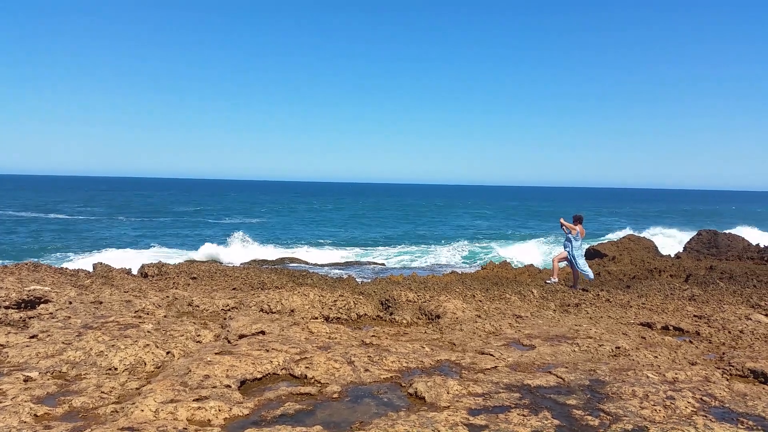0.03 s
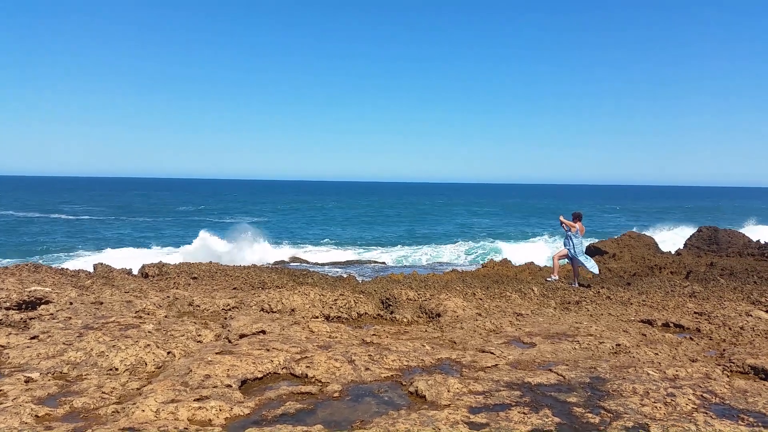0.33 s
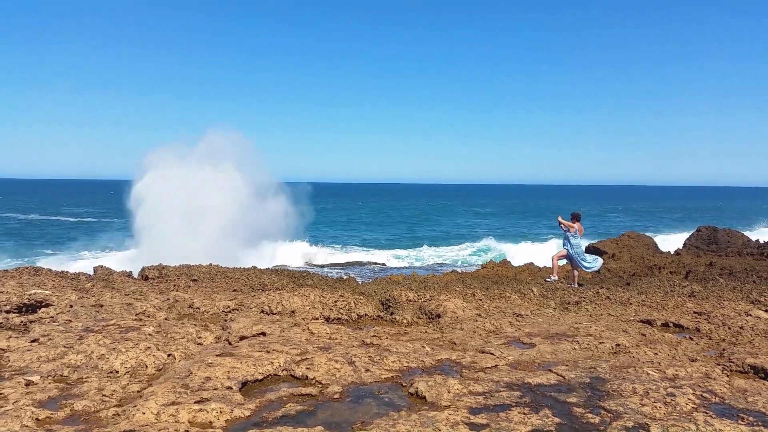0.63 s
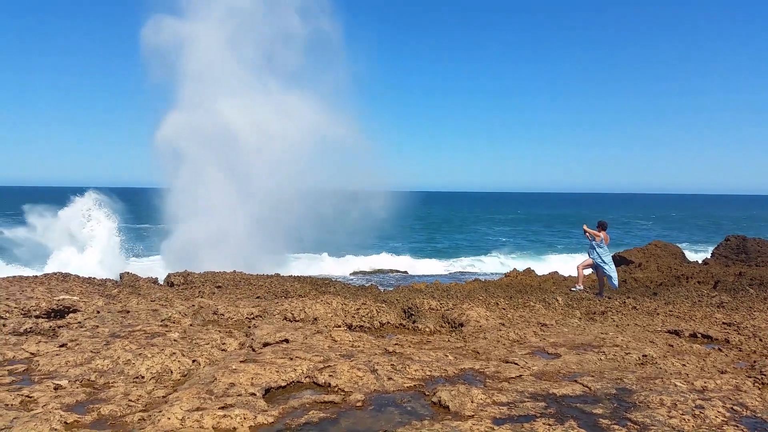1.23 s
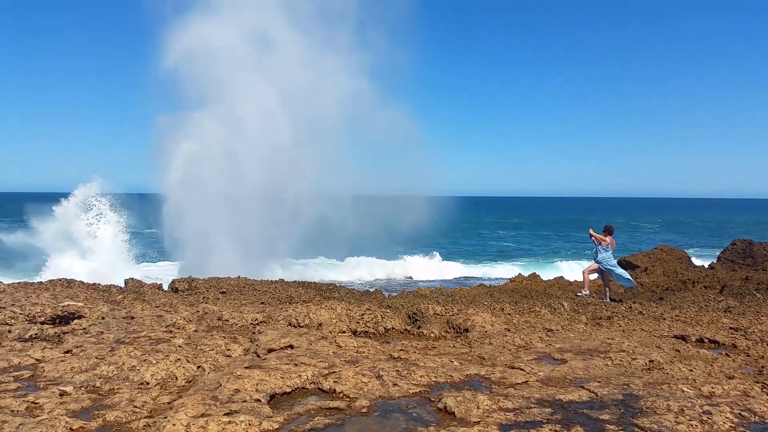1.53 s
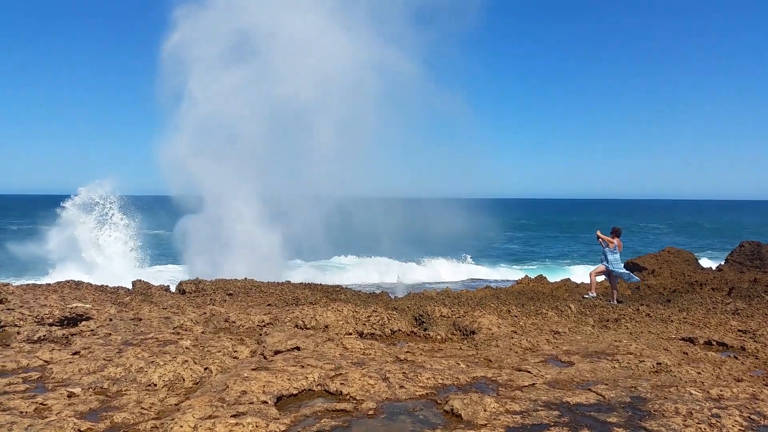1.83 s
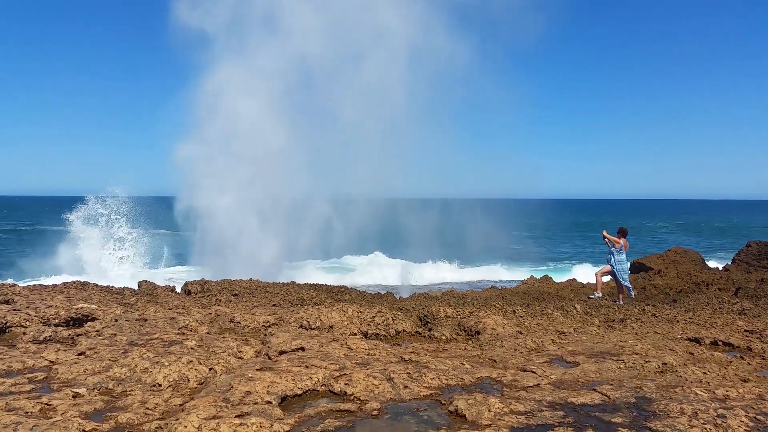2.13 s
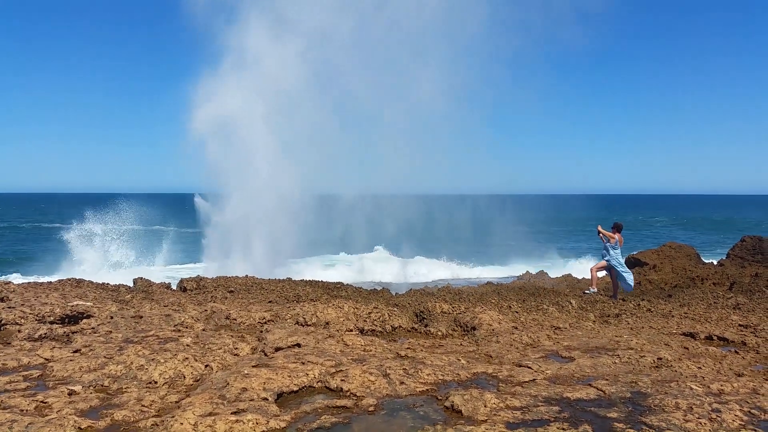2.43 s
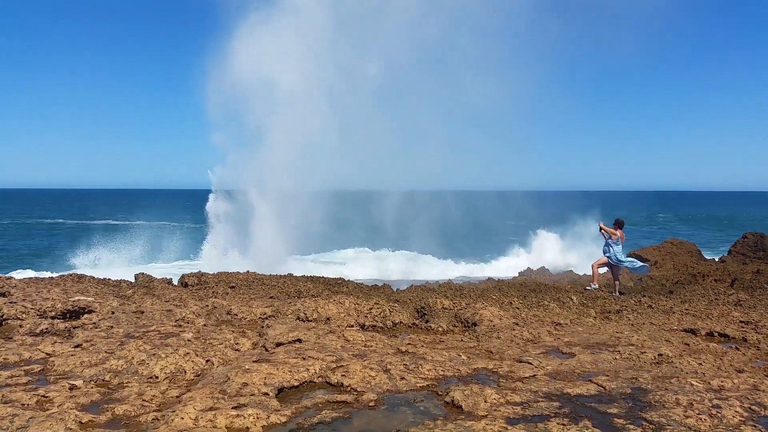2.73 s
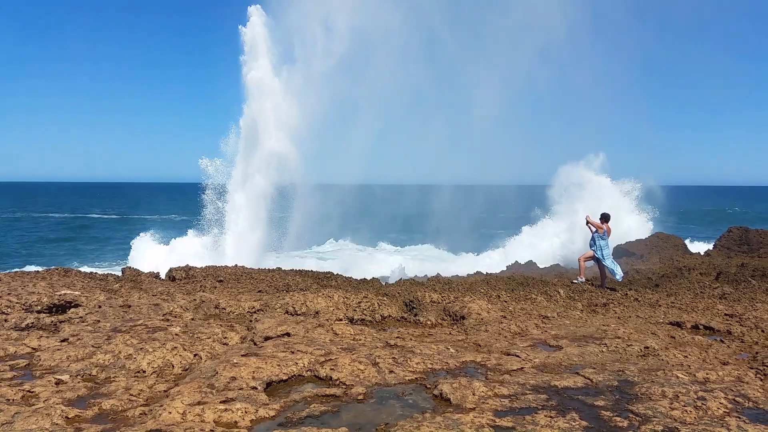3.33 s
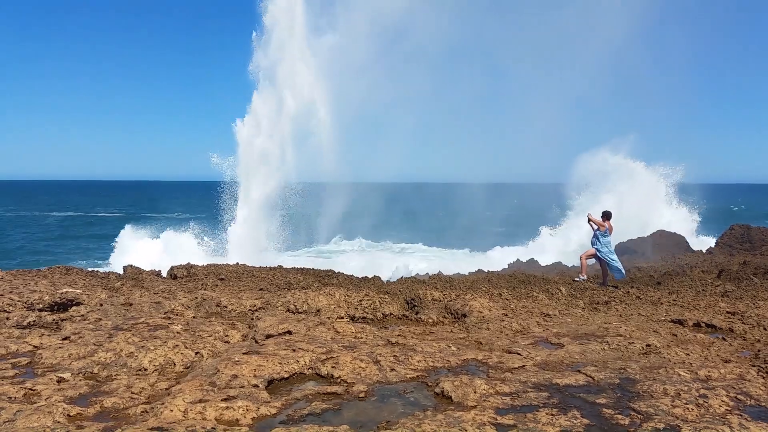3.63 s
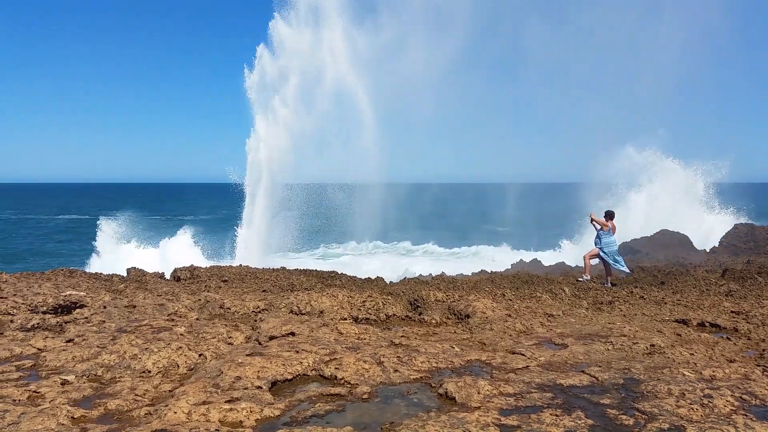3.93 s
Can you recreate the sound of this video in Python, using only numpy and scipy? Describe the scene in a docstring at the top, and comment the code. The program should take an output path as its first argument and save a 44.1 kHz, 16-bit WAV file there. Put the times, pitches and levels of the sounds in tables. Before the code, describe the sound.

Ocean surf makes a low, steady wash against coastal rocks, heard through loud, ragged wind buffeting the microphone. The high hiss of blowhole spray swells, dips briefly and returns, with a light patter of coarse drops near the end.

```python
"""Surf on a rocky shore, heard through a gusty sea wind. From the start, breakers make a dull wash
while eddies (swirls of air) sweep across the two microphone openings separately: a rumble that
tears, flaps and cracks in the gusts. From half a second on, a blowhole throws up hissing spray.
The hiss dips briefly at about two seconds, and just after three seconds a second jet
adds a patter of coarse drops."""
import sys
import numpy as np
from scipy import signal
from scipy.fft import rfft, irfft, next_fast_len
from scipy.io import wavfile
from scipy.ndimage import uniform_filter1d, map_coordinates

SR = 44100
rng = np.random.default_rng(int(sys.argv[2]) if len(sys.argv) > 2 else 0)


def bounce(signal):
    """Save signal as a 16-bit WAV file at the path given by the first command-line argument."""
    frames = np.transpose(np.atleast_2d(signal))
    limited = np.clip(frames, -1, 1)
    pcm = np.round(limited * 32767).astype(np.int16)
    wavfile.write(sys.argv[1], SR, pcm)


N = 176400  # 4 seconds
LEFT, RIGHT = -1, 1


def wind(gusts, side, rumble_db, rumble_growth, rasp_db):
    """Eddies blow past one microphone opening: stronger wind makes them louder and faster."""
    # tone of the eddies at wind strength 0: pitch_hz, level_db
    eddy_tone = [(25, -25), (60, 2), (130, 1.5), (230, -2.5), (330, -9.5), (500, -17), (900, -31.5),
                 (1600, -61), (3000, -71), (6000, -100)]
    # tone of the wind shaking the whole microphone body: pitch_hz, level_db
    rumble_tone = [(20, -9), (35, -2), (50, -4), (70, -3.5), (110, -2.5), (170, -7), (260, -13.5),
                   (400, -32.5), (800, -52.5)]
    # the opening lets mostly the low sounds through: pitch_hz, gain_db
    opening_filter = [(20, -11.5), (70, 1.5), (1500, 1), (2500, -10), (3500, -25), (4600, -28), (6000, -49),
                      (9000, -69)]
    overload_db, ceiling = 17, .96  # soft limits on the wind strength and on the air pressure
    flutter_db, double_speed_db = 2.5, 18  # random swing; rise in wind that doubles the eddies' speed
    eddy_db, eddy_growth = -20, .65  # a growth is the dB of sound gained per dB of wind
    flow = airflow(gusts, side)
    strength = soft_limit(flow, overload_db)
    speed = 2 ** ((strength + flutter_db * wander(596.9)) / double_speed_db)
    pattern = noise(eddy_tone, size=2 * N)
    # run through the pattern of eddies at the wind's changing speed
    eddies = map_coordinates(pattern, [np.cumsum(speed)], order=3, mode="wrap")
    eddies *= gain(eddy_db + eddy_growth * strength)
    rumble = noise(rumble_tone) * gain(rumble_db + rumble_growth * strength)
    pressure = soft_limit(eddies + rumble + rasp(flow, rasp_db), ceiling)
    return shape_tone(pressure * fade_ends(), opening_filter)


def airflow(gusts, side):
    """Wind strength in dB: the gusts flap at random and leap briefly when a single eddy slaps."""
    # eddies that slap one opening: time_s, peak_strength_db, side (-1 left, 1 right)
    slaps = [(.03, 23.14, -1), (0.05, 14.74, -1), (.062, 21.9, -1), (.073, 23.05, -1), (.104, 24.76, -1),
             (0.115, 26.95, -1), (.142, 21.64, -1), (.155, 24.9, -1), (.178, 9.13, 1), (.183, 23.66, -1),
             (0.2, 22.38, -1), (0.284, 21.02, -1), (.304, 23.27, -1), (.326, 22.13, -1), (.347, 27.46, -1),
             (.371, 21.04, -1), (.393, 20.08, -1), (.417, 21.86, -1), (0.442, 20.47, -1), (.467, 14.69, -1),
             (.553, 17, -1), (0.636, 19.13, -1), (.649, 22.25, -1), (.671, 14.99, -1), (.728, 12.01, -1),
             (.761, 13.9, -1), (.773, 19.98, -1), (.794, 12.53, -1), (.832, 19.15, -1), (.908, 14.06, -1),
             (1.161, 9.96, -1), (1.247, 17.1, -1), (1.265, 21.68, -1), (1.288, 18.64, -1),
             (1.322, 15.05, -1), (1.351, 12.37, -1), (1.69, 8.03, 1), (1.729, 13.16, -1), (1.735, 12.16, 1),
             (1.793, 14.33, -1), (1.828, 12.56, -1), (1.898, 21.04, -1), (1.948, 23.05, -1),
             (1.961, 19.97, -1), (1.973, 18.8, -1), (2.006, 13.05, -1), (2.047, 21.98, -1),
             (2.072, 16.21, -1), (2.121, 20.53, -1), (2.146, 12.3, 1), (2.157, 16.51, -1),
             (2.192, 20.85, -1), (2.208, 16.35, -1), (2.236, 16.02, -1), (2.29, 12.85, -1), (2.325, 9, 1),
             (2.378, 11.33, -1), (2.512, 8, 1), (2.656, 15.6, -1), (2.691, 8.1, 1), (2.703, 9.94, -1),
             (2.791, 8.9, -1), (2.836, 5.9, 1), (2.856, 11.84, -1), (2.894, 11.17, -1), (2.945, 12.96, -1),
             (3, 18.15, -1), (3.14, 10.42, -1), (3.159, 16.7, -1), (3.206, 11, 1), (3.218, 9.86, -1),
             (3.261, 13.33, 1), (3.289, 16.58, -1), (3.392, 17.4, -1), (3.415, 23.1, -1), (3.44, 17.36, -1),
             (3.476, 14.5, 1), (3.512, 15.57, -1), (3.536, 20.8, -1), (3.564, 16.3, -1), (3.646, 12, 1),
             (3.675, 18, 1), (3.688, 13.16, -1), (3.721, 11.5, -1), (3.963, 13, -1)]
    rise_s, fall_s, flap_db = .0019, .0034, 4
    t = np.arange(N) / SR
    flap = wander(119.75)
    fast_flap = flap - uniform_filter1d(flap, SR // 20)  # take out the slow drift
    strength = curve(gusts) + flap_db * fast_flap
    for time_s, peak_db, slap_side in slaps:
        if slap_side == side:
            near = np.abs(t - time_s) < 5 * fall_s
            age = t[near] - time_s
            width = np.where(age < 0, rise_s, fall_s)
            bump = np.exp(-.5 * (age / width) ** 2)
            strength[near] += bump * (peak_db - strength[near])
    return strength


def rasp(strength, rasp_db):
    """Air tears at the lip of an opening: a ragged crackle, with a brighter rip in hard gusts."""
    # tone of the tearing air: pitch_hz, gain_db
    rasp_tone = [(200, -5), (500, 9), (900, 2.5), (1500, -5), (2400, -18.5), (3200, -17.5), (4200, -14),
                 (8000, -52)]
    # tone of the brighter rip: pitch_hz, gain_db
    rip_tone = [(600, -20.5), (1300, -5.5), (2000, 0), (3000, -0.5), (3800, -6), (4800, -18), (8000, -49)]
    rasp_growth, rip_growth = 1.223, 1.71  # dB of sound per dB of wind
    crackle_db, rip_db, limit_db = 4.5, -53, 31
    tearing = rng.standard_normal(N) * gain(crackle_db * wander(690.3))
    body = shape_tone(tearing, rasp_tone) * gain(rasp_db + rasp_growth * soft_limit(strength, limit_db))
    smoothed = uniform_filter1d(strength, SR // 80)
    rip = shape_tone(tearing, rip_tone) * gain(rip_db + rip_growth * soft_limit(smoothed, limit_db))
    return body + rip


def cracks():
    """The airflow breaks away at the left opening: each time, a sharp pulse inside a brief tear."""
    # when the air cracks and how hard: start_s, relative_level_db
    crack_times = [(0.0293, -28), (0.0608, -22.5), (0.0734, -35.5), (0.1007, -32), (0.1134, -24),
                   (0.1174, -37), (0.1411, -33), (0.154, -29), (0.18, -23.5), (0.2009, -27.5),
                   (0.2714, -25.5), (0.3064, -25.5), (0.3456, -27), (0.3701, -29), (0.4379, -26.5),
                   (0.4704, -29.5), (0.5506, -44.5), (0.633, -43), (0.6484, -46), (0.7701, -40),
                   (0.832, -42), (0.9063, -36), (1.2428, -27), (1.2635, -24.5), (1.3209, -36),
                   (1.9455, -19.5), (1.9614, -25), (2.0712, -41.5), (2.1899, -31), (2.6534, -36),
                   (2.7014, -40), (2.9966, -33), (3.2874, -31), (3.4116, -28), (3.5334, -34),
                   (3.9614, -31.5)]
    # tone of one crack: pitch_hz, gain_db
    crack_tone = [(150, -8), (500, 2), (1000, 5.5), (2000, 8), (2800, -9), (3800, -20.5), (4800, -39.5),
                  (8000, -69)]
    rise_s, decay_s, tear_db, boost_db = .0011, .0013, -16.5, 8.5
    lead, size = 256, 2048  # samples: room before a crack, and its whole length
    out = np.zeros(N + SR)
    from_pulse_s = np.abs(np.arange(size - lead) / SR - rise_s)
    for start_s, level_db in crack_times:
        tear = rng.standard_normal(size - lead)
        burst = tear * np.exp(-from_pulse_s / decay_s) * gain(tear_db)
        burst[np.argmin(from_pulse_s)] = np.sign(tear[0])  # the pulse: a push or a pull, by chance
        burst = shape_tone(np.pad(burst, (lead, 0)), crack_tone)
        start = max(int(start_s * SR) - lead, 0)
        out[start:start + size] += burst / np.abs(burst).max() * gain(level_db + boost_db)
    return out[:N]


def spray():
    """Countless fine drops merge into a high hiss that swells, and dips now and then."""
    # level of the spray's hiss: time_s, relative_level_db
    hiss_level = [(0, -70), (.05, -66), (.12, -71), (.19, -66), (.43, -74), (.5, -65.5), (.57, -65),
                  (.61, -57), (.65, -58.5), (.69, -52.5), (.92, -51), (1.2, -49.5), (1.32, -52),
                  (1.42, -47), (1.85, -46.5), (2.07, -54), (2.25, -52.5), (2.4, -49.5), (2.75, -49),
                  (3, -50), (3.07, -45.5), (3.26, -49.5), (3.34, -45), (3.72, -46), (3.92, -47.5),
                  (4, -50.5)]
    # tone of the spray on the left: pitch_hz, level_db
    left_tone = [(1000, -43), (3700, -16), (4600, -20.5), (5500, -27.5), (7000, -20.5), (8300, -12),
                 (9800, -3.5), (11000, -1), (13000, -2), (15800, -11)]
    # tone of the spray on the right: pitch_hz, level_db
    right_tone = [(1000, -20), (3200, -29.5), (5500, -18), (6800, -22), (8200, -33.5), (9800, -21),
                  (11000, -14.5), (12200, -4.5), (13500, -2.5), (15800, -2.5)]
    flicker_db, left_db, right_db = 1.06, 4.5, 7
    level_db = curve(hiss_level) + flicker_db * wander(26)
    left = noise(left_tone) * gain(level_db + left_db)
    right = noise(right_tone) * gain(level_db + right_db)
    return np.array([left, right])


def jet():
    """Coarse drops of the second jet patter beneath the hiss, each one a tiny click."""
    # timing of the patter: start_s, full_s, fade_from_s, gone_s
    timing = (3.26, 3.33, 3.62, 3.95)
    # tone of the drops: pitch_hz, gain_db
    drop_tone = [(1500, -25), (3700, -3), (5000, -2), (7000, 5), (9000, -1), (12000, -3), (16000, -18)]
    drops_per_s, scatter_db, level_db = 2500, 5, -61.5
    lands = rng.random((2, N)) < drops_per_s / SR
    clicks = lands * rng.choice([-1, 1], (2, N))
    drops = clicks * gain(scatter_db * rng.standard_normal((2, N)))
    patter = np.array([shape_tone(side, drop_tone) for side in drops])
    swell = curve(list(zip(timing, (0, 1, 1, 0))))
    return patter / patter.std() * gain(level_db) * swell


def surf():
    """White water churns on the rocks and makes a dull wash."""
    # level of the wash: time_s, relative_level_db
    wash_level = [(0, -2), (.45, -10), (.75, -5.5), (1.1, -0.5), (1.6, 1), (2.1, -0.5), (2.6, 0.5),
                  (3.4, .5), (4, -1.5)]
    # tone of the wash: pitch_hz, level_db
    wash_tone = [(100, 20.5), (300, 19.5), (600, 8), (1000, -3), (1500, -8), (2000, -4), (2550, -6.5),
                 (3100, -17), (3900, -14.5), (4800, -28), (8000, -42.5), (16000, -35.5)]
    churn_db, left_db, right_db = 1.76, -33, -35.5
    return np.array([noise(wash_tone) * gain(curve(wash_level) + side_db + churn_db * wander(32))
                     for side_db in (left_db, right_db)])


def gain(db):
    """Turn decibels into a number to multiply a sound by."""
    return 10 ** (np.asarray(db) / 20)


def soft_limit(x, limit):
    """Leave small values almost alone and level big ones off towards the limit."""
    return limit * np.tanh(x / limit)


def curve(points):
    """Join (time_s, value) points with straight lines."""
    return np.interp(np.arange(N) / SR, *np.array(points, float).T)


def shape_tone(x, tone):
    """Turn each pitch up or down by (pitch_hz, gain_db) points, fading away below 20 Hz."""
    pitch_hz, gain_db = np.array(tone, float).T
    size = next_fast_len(len(x) + SR // 10, real=True)
    hz = np.maximum(np.arange(size // 2 + 1) * SR / size, 1)
    response = gain(np.interp(np.log(hz), np.log(pitch_hz), gain_db)) * np.minimum(hz / 20, 1)
    return irfft(rfft(x, size) * response, size)[:len(x)]


def noise(tone, size=N):
    """Noise with the given tone and a typical size of 1."""
    x = shape_tone(rng.standard_normal(size), tone)
    return x / x.std()


def wander(rate_hz):
    """Smooth random motion with a typical size of 1, taking rate_hz new turns a second."""
    hold = max(int(SR / rate_hz), 1)
    steps = rng.standard_normal(N)[np.arange(N) // hold]
    smooth = uniform_filter1d(uniform_filter1d(steps, hold), hold)
    return smooth / smooth.std()


def fade_ends(fade_s=.01):
    """A short fade in at the start and out at the end."""
    i = np.arange(N)
    from_end_s = np.minimum(i, i[::-1]) / SR
    return np.sin(np.pi / 2 * np.minimum(from_end_s / fade_s, 1)) ** 2


def scene():
    """Wind on both sides, harder on the left, over the blowhole and the surf."""
    # gusts at the left opening: time_s, strength_db
    left_gusts = [(0, -4), (.04, 6), (.13, 5), (.19, 7), (.22, 14), (.29, 17.5), (.44, 11), (.5, 2),
                  (.6, 1), (.78, 4), (.85, 1.5), (.96, -6.5), (1.1, -4), (1.23, -1.5), (1.26, 12.5),
                  (1.33, 4), (1.42, -4), (1.55, -7.5), (1.68, -6), (1.8, 0), (1.89, 11.5), (1.96, 11),
                  (2.022, 0), (2.06, 7), (2.15, 10), (2.35, 0), (2.43, 3), (2.6, -5), (2.68, 0), (2.82, -1),
                  (3.08, .5), (3.2, 3), (3.33, 1), (3.41, 10), (3.55, 7), (3.68, 2.5), (3.8, -4.5),
                  (3.92, -15), (3.97, 7.5), (4, 8)]
    # gusts at the right opening: time_s, strength_db
    right_gusts = [(0, -11.5), (.05, -5.5), (.13, -19), (.22, -16), (.32, -4), (.52, -15.5), (.8, -9),
                   (.93, -8), (1.17, -6), (1.3, -12), (1.55, -4), (1.72, -1.5), (1.85, -6.5), (1.96, -14),
                   (2.1, -7), (2.33, -5), (2.45, 2), (2.54, 2.5), (2.59, -6), (2.78, -6), (2.9, -16),
                   (2.97, -3), (3.08, -12), (3.15, -9), (3.23, 1), (3.35, -1), (3.41, -9.5), (3.5, 0.5),
                   (3.58, -9), (3.68, -1.5), (3.77, -9), (3.85, -5), (4, -18)]
    left = wind(left_gusts, LEFT, rumble_db=-17, rumble_growth=.31, rasp_db=-40.5) + cracks()
    right = wind(right_gusts, RIGHT, rumble_db=-13.5, rumble_growth=.75, rasp_db=-47)
    return np.array([left, right]) + spray() + jet() + surf()


def record(dry):
    """A steep filter cuts off the very highest treble."""
    top_hz = 15850
    return signal.sosfilt(signal.ellip(12, .2, 80, top_hz, fs=SR, output="sos"), dry)


dry = scene()
out = record(dry)
bounce(out)
```